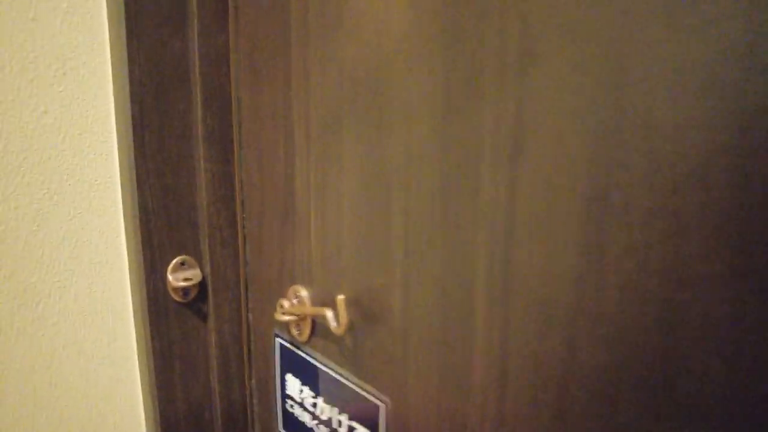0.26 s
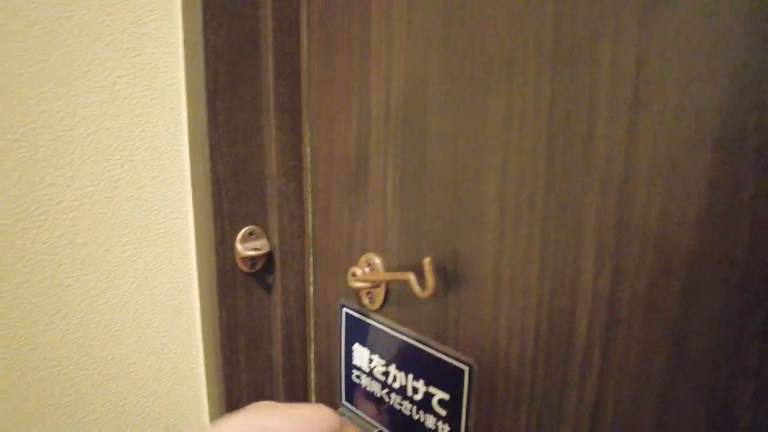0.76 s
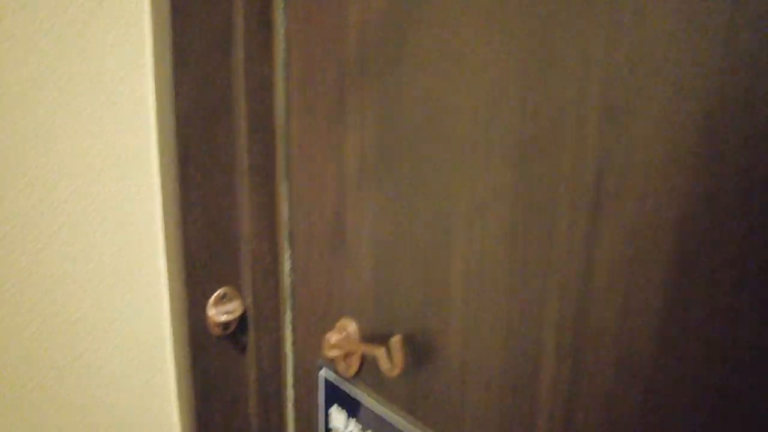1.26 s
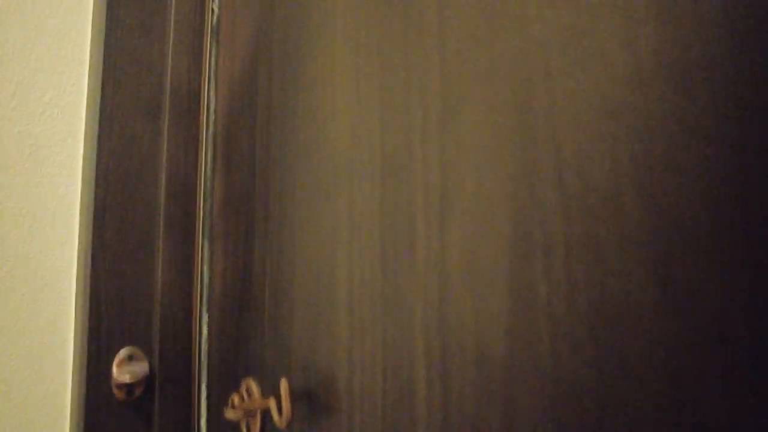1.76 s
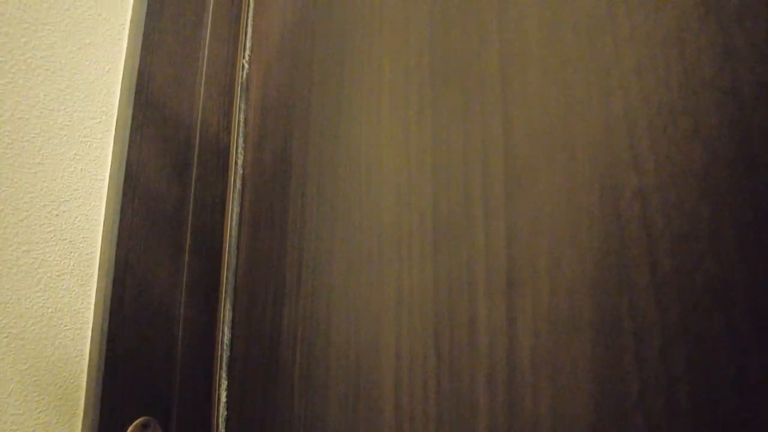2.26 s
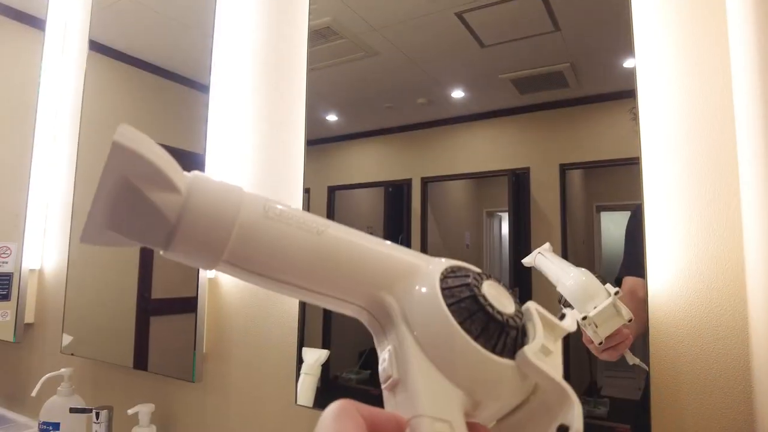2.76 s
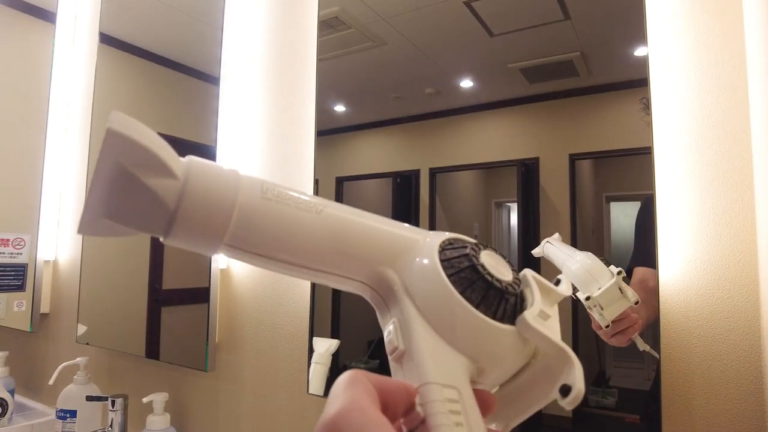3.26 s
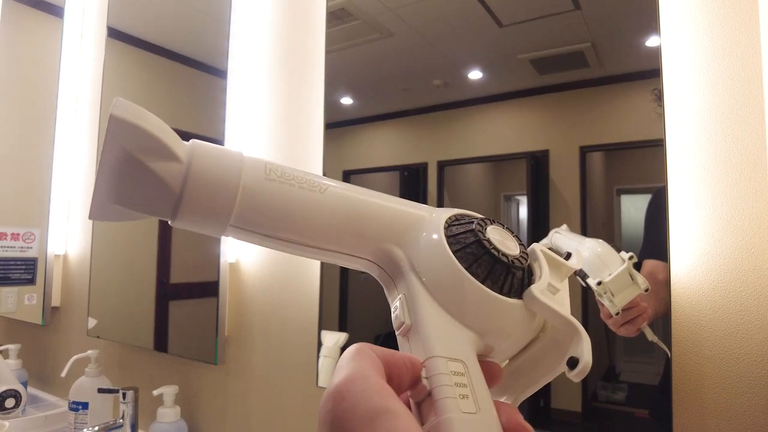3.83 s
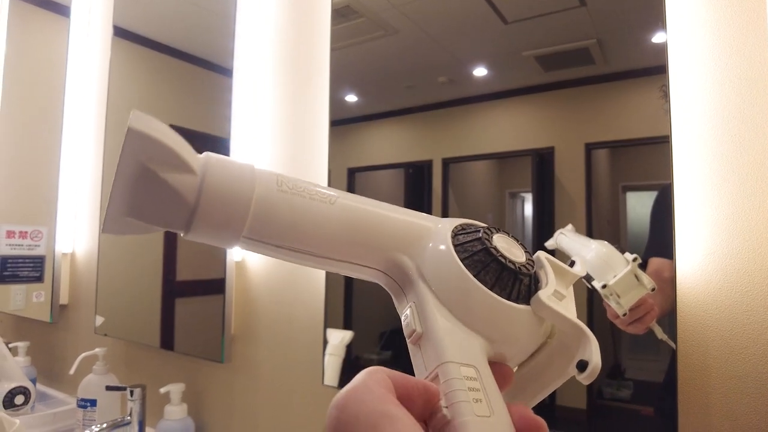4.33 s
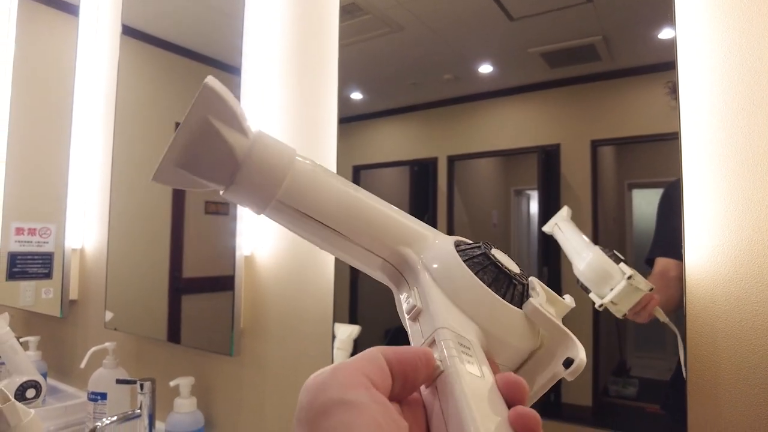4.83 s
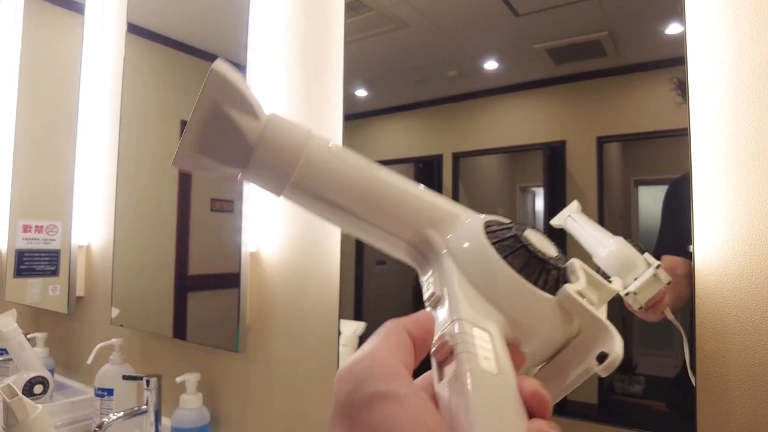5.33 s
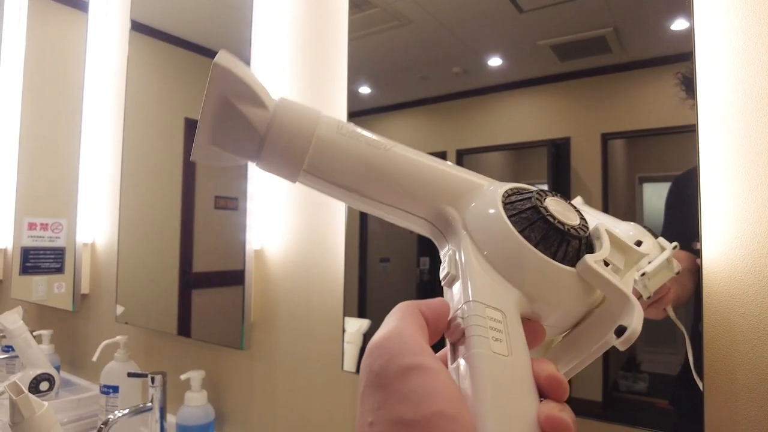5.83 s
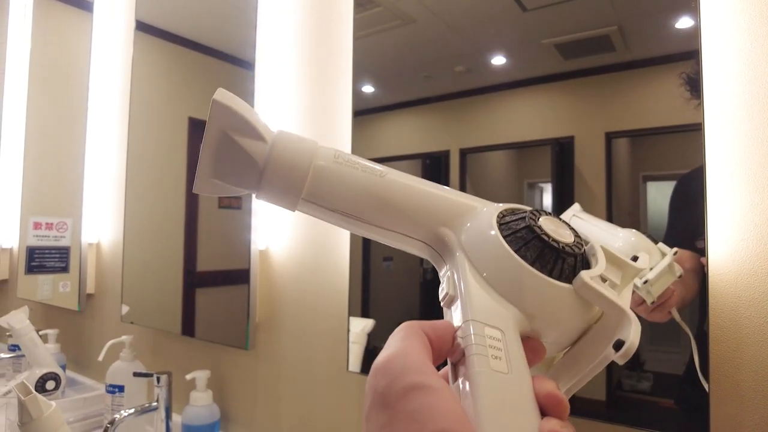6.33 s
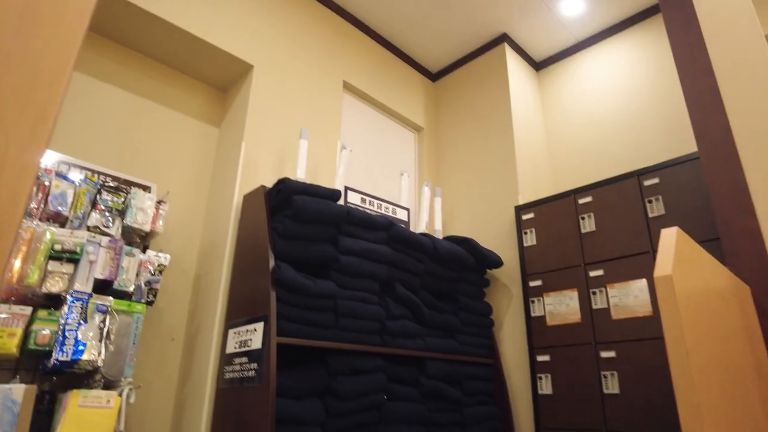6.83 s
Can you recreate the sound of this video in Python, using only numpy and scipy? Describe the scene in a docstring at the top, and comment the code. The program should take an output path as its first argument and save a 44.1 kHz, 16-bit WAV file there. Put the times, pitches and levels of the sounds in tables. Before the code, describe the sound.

Metal latch clicks and dull door knocks in an echoing hall, then a roaring hair dryer clicked off and on again, ending in faint room rumble.

```python
"""Three shots joined by hard cuts, heard in stereo at a hand-held camera; ventilation rumble lies under all.
First a hall: a wooden door is unlatched and pushed, with metal clicks, taps, scrapes and dull knocks.
Then a washroom: a hair dryer blows, its slide switch is clicked off, the fan coasts down, and it is
clicked on again in two steps. Last a quiet locker room. Air, rooms and rubbing are shaped noise;
metal and wood are decaying modes; echoes are noise tails that die at each frequency's own speed."""
import sys
import numpy as np
from scipy import signal
from scipy.fft import rfft, irfft, next_fast_len
from scipy.io import wavfile
from scipy.ndimage import uniform_filter1d, map_coordinates

SR = 44100
rng = np.random.default_rng(int(sys.argv[2]) if len(sys.argv) > 2 else 0)


def store_pcm(level_fs):
    """Save levels as 16-bit WAV."""
    pcm = np.round(np.clip(level_fs, -1, 1) * 32767).astype(np.int16)
    wavfile.write(sys.argv[1], SR, np.atleast_2d(pcm).T)


def level_to_linear(level):
    """Convert decibel levels to linear amplitude factors, elementwise."""
    exponent = np.asarray(level, float) / 20
    return 10 ** exponent


N = 312669
TIME = np.arange(N) / SR


def unit(x):
    """Scaled to rms 1."""
    return x / np.sqrt(np.mean(x ** 2) + 1e-20)


def along(points, hz):
    """Reads (Hz, value) points on a log frequency axis."""
    f, v = np.transpose(points)
    return np.interp(np.log(hz + 1), np.log(f + 1), v)


def curve(rows, column=1):
    """Joins timed rows into one value per sample."""
    rows = np.asarray(rows)
    return np.interp(TIME, rows[:, 0], rows[:, column])


def wobble(rate):
    """A smooth random curve, rate knots a second."""
    knots = rng.standard_normal(int(N * rate / SR) + 4)
    return map_coordinates(knots, [TIME * rate])


def filtered(x, response):
    """x times a response of frequency."""
    m = next_fast_len(x.shape[-1] + 8192)
    hz = np.fft.rfftfreq(m, 1 / SR)
    return irfft(rfft(x, m) * response(hz), m)[..., :x.shape[-1]]


def rush(level_db, alike, patchy_db):
    """Stereo noise of mid rms 1 with patches of random gain; level_db is a function of Hz."""
    z = signal.stft(rng.standard_normal((2, N)), nperseg=512)[2]
    field = rng.standard_normal(z.shape[1:])
    field = uniform_filter1d(uniform_filter1d(field, size=5, axis=0), size=12, axis=1)
    pair = signal.istft(z * level_to_linear(patchy_db * unit(field)), nperseg=512)[1][:, :N]

    def mid_side_gain(hz):
        slope = np.tan(np.arccos(np.clip(along(alike, hz), 0, 1)) / 2)
        return level_to_linear(level_db(hz)) * [np.ones_like(hz), slope]

    mid, side = filtered(pair, mid_side_gain)
    return np.array([mid + side, mid - side]) / np.std(mid)


def ringing(modes, t, spread_db):
    """One row per decaying mode, each at a new random strength."""
    hz, t60 = np.transpose(modes)[:, :, None]
    strength_db = spread_db * rng.standard_normal(hz.shape)
    return level_to_linear(strength_db - 60 * t / t60) * np.sin(2 * np.pi * hz * t)


def echoes(x, decay, colour):
    """A new diffuse room tail for each ear, each frequency dying at its own speed."""
    hz, t, z = signal.stft(rng.standard_normal((2, SR // 2)), SR, nperseg=128)
    fall = level_to_linear(along(colour, hz)[:, None] - 60 * t / along(decay, hz)[:, None])
    tail = signal.istft(z * fall, SR, nperseg=128)[1]
    tail *= np.minimum(np.arange(tail.shape[1]) / (0.00057 * SR), 1)  # rises over 0.57 ms
    return signal.fftconvolve(x[None], tail / np.linalg.norm(tail[0]), axes=1)


def blended(x, colour):
    """A pulse with the energy of x and its smooth colour: the room hears all directions of a contact."""
    pulse = filtered(signal.unit_impulse(len(x), 64), colour)
    return pulse * np.linalg.norm(x) / np.linalg.norm(pulse)


def add(out, s, sound):
    """Mixes a sound in from time s."""
    part = out[:, round(s * SR):][:, :sound.shape[1]]
    part += sound[:, :part.shape[1]]


def ears(pan_db):
    """Left and right gain; positive leans left."""
    return level_to_linear(np.array([[pan_db / 2], [-pan_db / 2]]))


# the dryer shot: start_s, end_s
SHOT_CUTS = [2.485, 6.5887]
# steady tone of each place: pitch_hz, level_db (per Hz)
HALL_TONE = [(41, -29.5), (70, -9), (77, -22), (105, -1.5), (172, -7), (258, -9.5), (330, -19), (472, -17),
             (505, -24), (791, -48), (1620, -41.5), (12800, -69), (15000, -65.5)]
WASHROOM_TONE = [(40, -31), (70, 1), (95, -1.5), (118, 6), (150, -4), (220, -9.5), (280, -4.5), (550, -7.5),
                 (800, -10.5), (900, -22), (1200, -20), (1600, -16), (1750, -22), (3000, -40), (6000, -57)]
LOCKER_ROOM_TONE = [(41, -39), (70, -23), (112, -1), (147, -22.5), (168, -10), (225, -11), (395, -24),
                    (472, -16), (605, -35), (926, -28.5), (991, -33.5), (1420, -33.5), (15000, -62)]
# hall, washroom and locker room in turn: level_db
ROOMS_DB = [-40, -44, -46.5]
# sound of the rooms at the two ears: pitch_hz, likeness (1 = left and right alike)
ROOM_LIKENESS = [(30, 0.9), (130, 0.99), (290, 0.81), (640, .2), (1400, 0.61), (6800, .1)]
# drifting low sound: start_s, throb_level_db, rumble_level_db
RUMBLE = [(0.0, -50, -35), (0.2, -33, -33), (0.33, -34, -30.5), (0.4, -33, -39.5), (0.7, -34, -52),
          (1.1, -40.5, -32.5), (1.3, -25, -42), (1.43, -27.5, -39.5), (1.54, -39, -45.5), (1.68, -31, -46),
          (2.0, -40, -43.5), (2.2, -37, -36), (2.6, -41.5, -45), (4.6, -45.5, -45), (4.82, -37.5, -42),
          (5.1, -40.5, -49.5), (6.5, -46.5, -46), (7.09, -57, -54)]
# colour of the rumble: pitch_hz, level_db (per Hz)
RUMBLE_COLOUR = [(21, -31.5), (35, -2), (55, -13.5), (76, -11.5), (90, -22.5), (120, -38), (200, -120)]
# sleeve and door seal brushing: start_s, level_db
RUSTLE = [(0.0, -58), (0.14, -51.5), (0.35, -51), (0.82, -52), (0.96, -58), (1.28, -47.5), (1.47, -57),
          (2.2, -56), (2.38, -51.5), (2.47, -55.5)]
# colour of the brushing: pitch_hz, level_db (per Hz)
CLOTH = [(350, -12), (600, 3), (939, -8.5), (1470, -6.5), (1680, -10), (3510, -23), (14000, -50.5)]


def rooms():
    """Each shot has its own noise-like room tone; deep rumble drifts over all, rustling over the hall."""
    shot = np.searchsorted(SHOT_CUTS, TIME)
    tones = []
    for shape, db in zip((HALL_TONE, WASHROOM_TONE, LOCKER_ROOM_TONE), ROOMS_DB):
        air = rush(lambda hz: along(shape, hz), ROOM_LIKENESS, patchy_db=1.5)
        tones.append(level_to_linear(db + 1.6 * wobble(4.7)) * air)
    # a broad deep resonance at 27.24 Hz
    throb = filtered(rng.standard_normal(N), lambda hz: 1 / (1 + ((hz - 27.24) / 8) ** 2))
    throb = level_to_linear(curve(RUMBLE) + 0.74 * wobble(2.78)) * unit(throb) * ears(-2.6)
    rumble = rush(lambda hz: along(RUMBLE_COLOUR, hz), ROOM_LIKENESS, patchy_db=2.5)
    rumble *= level_to_linear(curve(RUMBLE, column=2) + 1.2 * wobble(3.9))
    rustle = rush(lambda hz: along(CLOTH, hz), ROOM_LIKENESS, patchy_db=1.0)
    rustle *= level_to_linear(curve(RUSTLE) + 0.8 * wobble(26.15))
    return np.choose(shot, tones) + throb + rumble + rustle * (shot == 0)


# ringing of latch, handle and hook: pitch_hz, t60_s
BRASS = [(2900, .04), (4800, .09), (5900, .035), (8100, .09), (11400, .22), (13700, .12)]
# strength of the three brass modes that the hook rings: level_db
HOOK_DB = [-3, 0, -17]
# the loose hook chatters: start_s, end_s, level_db
RATTLE = [(0.207, 0.3, -59.5), (0.3, 0.385, -54.5), (1.108, 1.164, -60), (2.186, 2.31, -72)]
# hinge: start_s, end_s, start_pitch_hz, end_pitch_hz, level_db, flicker_db
SQUEAKS = [(1.05, 1.105, 13900, 14500, -69, 1.5), (1.295, 1.335, 14700, 14100, -69, 1.5),
           (1.73, 2.0, 3420, 3540, -69.5, 5.5), (1.72, 1.98, 1480, 1400, -64, 6)]


def handle():
    """Uneven scratchy taps ring three brass modes as the hook turns; the hinge squeaks, thin and breathy."""
    taps, squeak, t = np.zeros(N), np.zeros(N), np.arange(SR // 8) / SR
    for a, b, db in RATTLE:
        times = np.arange(a, b, .006)
        uneven = times + .003 * rng.standard_normal(len(times))
        taps[(uneven * SR).astype(int)] = level_to_linear(db + 3 * rng.standard_normal(len(times)))
    grit = level_to_linear(-60 * t / .012) * rng.standard_normal(len(t))
    grit = filtered(grit, lambda hz: 1 / (1 + ((hz - 6000) / 2000) ** 2))
    hook = level_to_linear(HOOK_DB) @ ringing(BRASS, t, spread_db=1)[1:4] + grit
    for a, b, start_hz, end_hz, db, flicker_db in SQUEAKS:
        u = np.clip((TIME - a) / (b - a), 0, 1)
        pitch = (start_hz + (end_hz - start_hz) * u) * (1 + 0.015 * wobble(300))
        swell = level_to_linear(db + flicker_db * wobble(45.1)) * np.sin(np.pi * u)
        squeak += swell * np.sin(2 * np.pi * np.cumsum(pitch) / SR)
    return signal.fftconvolve(taps, hook)[:N] + squeak


# decay of the hall: pitch_hz, t60_s
HALL_DECAY = [(200, .5), (1000, .55), (4000, .48), (8000, .42), (15000, .36)]
# colour of the hall's echo: pitch_hz, level_db
HALL_COLOUR = [(200, 8), (600, 8), (1500, 4), (4000, -3), (9000, -7), (15000, -13.5)]
# modes of the thin door panel: pitch_hz, t60_s, level_db
PANEL = [(540, 0.05, -0.5), (760, 0.036, -3.5), (983, .045, -2.5), (1296, 0.049, -4), (1625, .035, -6),
         (1960, .03, -7.5), (2300, 0.025, -8.5), (2700, .02, -9.5)]
# light taps on the panel: start_s, level_db
TAPS = [(0.109, -47), (.257, -47), (.300, -28.5), (.32, -33.5), (.338, -36.5), (.477, -43), (0.525, -47.5),
        (0.536, -41.5), (0.626, -40.5), (.676, -42.5), (2.159, -48), (2.335, -50), (2.391, -44)]
# bolt and hand drag over wood; the row at 0.774 s is a short noise swelling just before the slam:
# start_s, end_s, centre_pitch_hz, level_db
SCRAPES = [(0.1, .2, 2200, -65), (0.297, .41, 1880, -50), (0.528, 0.596, 2500, -61),
           (0.657, 0.728, 1890, -43), (0.774, 0.797, 4620, -44), (1.718, 1.981, 5500, -71),
           (1.86, 1.96, 3000, -63), (1.339, 1.378, 2600, -53), (2.332, 2.361, 2200, -55),
           (2.395, 2.437, 2200, -52)]


def panel():
    """Light taps ring the thin door panel; scrapes and a swell before the slam are uneven grains of noise."""
    out, t = np.zeros((2, N)), np.arange(SR // 4) / SR
    grains_per_s = 5900
    for s, db in TAPS:
        modes = ringing([m[:2] for m in PANEL], t, spread_db=5.5)
        ring = level_to_linear(db + np.transpose(PANEL)[2]) @ modes * (1 - np.exp(-t / .001))
        add(out, s, ring * ears(.6))
        add(out, s, level_to_linear(-2.5) * echoes(ring, HALL_DECAY, HALL_COLOUR))
    for a, b, centre_hz, db in SCRAPES:
        u = np.arange(round((b - a) * SR)) / ((b - a) * SR)
        grains = (rng.random(len(u)) < grains_per_s / SR) * level_to_linear(3 * rng.standard_normal(len(u)))
        grains = grains * (.7 + rng.standard_normal((2, len(u))))  # partly alike at the two ears
        rub = filtered(grains, lambda hz: (1 + (np.log2((hz + 1) / centre_hz) / 0.94) ** 2) ** -2)
        rub = unit(rub) * level_to_linear(db) * np.sqrt(np.sin(np.pi * u))
        add(out, a, rub)
        add(out, a, level_to_linear(-28.0) * echoes(rub[0], HALL_DECAY, HALL_COLOUR))
    return out


# blows on door leaf and grip: start_s, level_db, lowest_mode_level_db
KNOCKS = [(0.137, -23, -0.5), (0.230, -11.5, -4), (0.262, -18.5, 0), (0.29, -18, 2), (0.32, -12.5, -8),
          (0.423, -16.5, -5.5), (0.479, -14.5, -3.5), (0.794, -19, -4.5), (0.829, -24, -4),
          (1.098, -18.5, 0.5), (1.137, -20, -5), (1.239, -9, -6), (1.279, -14.5, 0), (2.213, -16, -10),
          (2.24, -24.5, 1.5), (2.388, -15.5, -8), (2.41, -24, -7.5)]
# low modes of the door leaf: pitch_hz, t60_s
LEAF = [(119, 0.12), (175, 0.064), (225, 0.071), (280, 0.084), (480, 0.082)]
# strength of the upper four leaf modes: level_db
LEAF_DB = np.array([1.5, -3.0, -8.5, -19.5])


def knocks():
    """Soft blows ring the low modes of the door leaf, alike at both ears."""
    out, t = np.zeros((2, N)), np.arange(SR // 3) / SR
    soft_onset = (1 - np.exp(-t / 0.0041)) ** 2
    for s, db, low_db in KNOCKS:
        modes = ringing(LEAF, t, spread_db=2.5)
        leaf = level_to_linear(low_db) * modes[:1] + level_to_linear(LEAF_DB) @ modes[1:]
        add(out, s, level_to_linear(db) * leaf * soft_onset)
    return out


# latch and handle contacts; the slam starts at 0.795 s, the row at 0.788 s is a short noise just before it:
# start_s, level_db, centre_pitch_hz, room_level_db, ring_level_db
LATCH = [(.107, -50, 1900, 4, -26), (.111, -60, 11000, -3, -26), (.143, -43, 2920, -6, -16),
         (.147, -48.5, 13800, -3, -20), (0.217, -46, 5700, 4, -1), (.205, -57, 6000, -4, -14),
         (0.232, -47, 6500, -2, -10), (0.232, -50, 13700, 2, -17), (0.295, -25.5, 2980, 3.5, -32),
         (.299, -24, 1190, 3, -26.5), (.348, -34, 5700, 0, -15), (.528, -61.5, 7000, -3.5, -35),
         (.540, -48, 3500, 4, -31), (.541, -52, 12800, -4.5, -24), (0.625, -35.5, 3500, 3.5, -22.5),
         (0.666, -43.5, 5000, 4, -23.5), (0.676, -34, 2550, 5, -23.5), (0.788, -22, 2490, 1.5, -24),
         (0.7952, -7, 3320, 7, -32.5), (.797, -12, 11000, -0.5, -32), (.801, -26, 776, -6, -33),
         (1.110, -40.5, 6100, 4, -22.5), (1.126, -40, 1500, 5, -25), (1.154, -48.5, 5900, -3, -26),
         (1.242, -41, 1810, 4.5, -22), (1.217, -57, 8000, -4.5, -28), (1.404, -54.5, 9000, -4.5, -30),
         (1.333, -34.5, 2880, -4.5, -14), (1.334, -44.5, 11400, 4.5, -29), (2.159, -37.5, 4700, 2.5, -24.5),
         (2.160, -37, 2600, 4, -22), (2.180, -37.5, 5550, 4, -18), (2.18, -42, 8100, 7, -10),
         (2.183, -49.5, 11300, 1, -1), (2.324, -35.5, 5500, 1.5, -21), (2.325, -41, 10000, -2, -24),
         (2.334, -43, 2200, 0, -20), (2.391, -39.5, 2590, -6, -18), (2.397, -46, 3200, -13, -21)]


def latch():
    """Each row is a crack of noise around its centre, echoed long by the hall; near brass modes ring on."""
    out, t = np.zeros((2, N)), np.arange(SR // 4) / SR
    envelope = level_to_linear(-60 * t / 0.018) * (1 - np.exp(-t / 0.0012))
    for s, db, centre_hz, room_db, ring_db in LATCH:
        # crack width in octaves: wider with force, narrower when the brass rings freely
        breadth = max(1.97 + 0.01 * (db + 35.5) - 0.36 * (ring_db + 24.0), .3)
        colour = lambda hz: (1 + (np.log2((hz + 1) / centre_hz) / breadth) ** 2) ** -2.5
        noise = envelope * rng.standard_normal((2, len(t)))
        # the direct crack loses its top above 14970 Hz
        crack, other = filtered(noise, lambda hz: colour(hz) / (1 + (hz / 14970) ** 4))
        scale = level_to_linear(db) / np.abs(crack).max()
        crack *= scale
        # above 3550 Hz the two ears hear a crack differently
        other = scale * filtered(other, lambda hz: .55 / np.sqrt(1 + (3550 / (hz + 1)) ** 2))
        reach_db = -55 * np.abs(np.log2(np.transpose(BRASS)[0] / centre_hz))
        ring = level_to_linear(db + ring_db + reach_db) @ ringing(BRASS, t, spread_db=0.5)
        add(out, s, (crack + ring + other * [[1], [-1]]) * ears(-0.48))
        add(out, s, level_to_linear(room_db) * echoes(blended(crack, colour) + ring, HALL_DECAY, HALL_COLOUR))
    return out


# slide switch contacts: start_s, level_db, low_level_db, middle_mode_level_db, scrape_level_db
SWITCH = [(4.2892, -8.5, -1.5, -11.5, -15.5), (4.319, -17.5, 3.5, -9, -12.5), (4.588, -25, 1, -8.5, -8),
          (4.941, -31.5, 5.5, -2.5, -14), (4.9686, -37, 5, -6, -4.5), (5.008, -25.5, 4, 0, -10.5),
          (5.033, -52, 3.5, -3, -5), (5.1, -5.5, 1, 0.5, -20.5), (5.2413, -22.5, 4.5, -2, -9.5),
          (5.2464, -26.5, 6, -5, -9), (5.255, -26.5, 7, 4, -6.5)]
# resonances of the slider shell: pitch_hz, width_hz, level_db
PLASTIC = [(1875, 750, -2.5), (3860, 2300, -4.5), (6500, 770, 5.5), (8400, 1000, 3.5), (13700, 6500, -10)]
# decay of the tiled washroom: pitch_hz, t60_s
TILES = [(1000, .22), (4000, .24), (8000, .22), (15000, .18)]
# colour of the washroom's echo: pitch_hz, level_db
TILE_COLOUR = [(1000, 11.5), (4000, 2.5), (8000, -5), (15000, 3)]


def switch():
    """A plastic slider snaps: sharp blows and a short scrape coloured by the shell, then the tiled room."""
    out, t = np.zeros((2, N)), np.arange(SR // 20) / SR
    left_lag_s = .00003  # the left ear hears the switch later
    for s, db, low_db, middle_db, scrape_db in SWITCH:
        burst = level_to_linear(scrape_db) * np.exp(-t / .003) * rng.standard_normal(len(t))  # the slider scrapes home
        burst[[0, 30]] += .6, 1  # the detent gives, then snaps home

        def shell(f):
            total = 0
            for k, (c, w, g) in enumerate(PLASTIC):
                gain = (-1) ** k * level_to_linear(g + low_db * (k < 2) + middle_db * (k == 2))
                total = total + gain * 1j * f * w / (c * c - f * f + 1j * f * w)
            return total

        snap = filtered(burst, shell)
        snap *= level_to_linear(db) / np.abs(snap).max()
        lag = lambda f: np.exp(1j * np.pi * f * left_lag_s * [[-1], [1]])
        add(out, s, filtered(snap * ears(-0.5), lag))
        add(out, s, level_to_linear(-6.5) * echoes(blended(snap, shell), TILES, TILE_COLOUR))
    return out


# the slider is pushed on in two steps: start_s, speed aimed at (share of full), rise_s
STEPS = [(5.1, .48, 0.01483), (5.24, 1, 0.11)]


def fan_speed():
    """Full speed, a coast against air drag once off, then a slow-starting rise to each new setting."""
    off_s, coast_s = 4.308, .33  # air drag halves the speed in coast_s
    # a power over 1: the fan holds its speed a moment before it sags
    speed = 1 / (1 + (np.maximum(TIME - off_s, 0) / coast_s) ** 1.06)
    for s, aim, rise_s in STEPS:
        u = np.maximum(TIME - s, 0) / rise_s
        rise = aim - (aim - speed[round(s * SR)]) * (1 + u) * np.exp(-u)
        speed = np.where(TIME > s, rise, speed)
    return speed


# air through the barrel: pitch_hz, level_db (per Hz)
ROAR = [(88, -46), (150, -12), (294, -1.5), (584, -2), (945, -4), (1040, -1), (1570, -5), (1800, -7),
        (4000, -17.5), (5200, -37.5), (8800, -120)]
# jet and grille: pitch_hz, level_db (per Hz)
HISS = [(1470, -26.5), (2500, -8), (2680, -7), (3620, -11.5), (4230, -2.5), (7740, -4), (9840, -10),
        (15100, -16), (15900, -16)]
# peaks and dips the room gives the dryer noise: pitch_hz, width_hz, level_db
ROOM_PEAKS = [(300, 33, 4.5), (605, 45, 7.5), (731.6, 11.4, 9.5), (826, 23, 9.5), (952.5, 81, 11),
              (1021, 38, -12), (1308, 90, 4), (1586, 106, 6.5), (2134, 250, 7.5), (2672, 97, 7.5),
              (3253, 330, 6), (4200, 800, 4.5), (7000, 620, -3.5), (8100, 600, 0.5)]
# fan tone: multiple of the blade pitch, level_db at full speed
BLADES = [(1, -42.5), (2, -41), (4, -71.5)]
# the hand turns the nozzle: start_s, level_db
AIM = [(2.5, 0.1), (3.5, 0.3), (5.6, 0.53), (6.2, -0.6), (6.6, 0.3)]
# dryer noise at the two ears: pitch_hz, likeness (1 = left and right alike)
DRYER_LIKENESS = [(60, 0.98), (290, 0.94), (500, 1), (750, 0.38), (1400, 1), (3100, 0.52), (6800, 0.59),
                  (9300, 0.47), (15000, 0.456)]
# dryer, left minus right: pitch_hz, level_db
TILT = [(60, -7.5), (180, 0.5), (550, 1), (1650, 1.0), (4970, -1), (15000, 1.0)]
# dryer, how far the left ear leads: pitch_hz, lead_rad
LEAD = [(0, 8.5), (600, -0.94), (860, 2), (1290, 0.78), (2500, -1.06), (4390, 1.4), (6030, -1), (8790, 1.5),
        (9130, 0.5), (9650, -3.5), (10200, 1.5), (12500, 1), (15800, 0.5), (16500, 5)]


def dryer():
    """Roar and hiss grow as powers of fan speed, hiss faster; blades sing; a switch click's ring fades."""
    speed = fan_speed()
    speed_db = 20 * np.log10(speed)
    aim_db = curve(AIM)
    peaks = lambda hz: sum(db / (1 + (2 * (hz - c) / w) ** 2) for c, w, db in ROOM_PEAKS)

    flutter = aim_db + 0.084 * wobble(3.7) + 0.26 * wobble(14)
    roar = rush(lambda hz: along(ROAR, hz) + peaks(hz), DRYER_LIKENESS, patchy_db=1.0)
    roar *= level_to_linear(-30.0 + 2.73 * speed_db + flutter)
    hiss = rush(lambda hz: along(HISS, hz) + peaks(hz), DRYER_LIKENESS, patchy_db=0.4)
    hiss *= level_to_linear(-37.5 + 3.13 * speed_db + aim_db)

    # a narrow 6.5 kHz ring left by the switch click fades in the room
    click_s, second_step_s = STEPS[0][0], STEPS[1][0]
    narrow = lambda hz: -10 * np.log10(1 + ((hz - 6550) / 130) ** 2)
    click_ring = rush(narrow, DRYER_LIKENESS, patchy_db=5.5)
    click_ring *= level_to_linear(-47.5 - 60 * np.abs(TIME - click_s))  # fades 60 dB a second
    click_ring *= (TIME > click_s) & (TIME < second_step_s)

    blade_hz = 681  # at full speed
    turn = 2 * np.pi * np.cumsum(blade_hz * speed * (1 + 0.00306 * wobble(9.5))) / SR
    tone = sum(level_to_linear(db + 4.8 * speed_db + 2.2 * wobble(12)) * np.sin(k * turn) for k, db in BLADES)

    def left_right(hz):
        sides = np.array([[1], [-1]])
        return level_to_linear(along(TILT, hz) / 2 * sides) * np.exp(.5j * along(LEAD, hz) * sides)

    return filtered(roar + hiss + click_ring + tone, left_right)


def scene():
    """Hard cuts join the shots: door in the hall, dryer in the washroom, quiet locker room."""
    shot = np.searchsorted(SHOT_CUTS, TIME)
    door = latch() + handle() + knocks() + panel()
    washroom = dryer() + switch()
    return rooms() + door * (shot == 0) + washroom * (shot == 1)


def band_limit(x):
    """A steep low-pass at the top of the band."""
    return signal.sosfilt(signal.butter(12, 16990, fs=SR, output="sos"), x)


def record(dry):
    """The camera keeps nothing above its band limit of 15950 Hz."""
    mix = filtered(dry, lambda hz: hz < 15950)
    return band_limit(mix)


dry = scene()
out = record(dry)
store_pcm(out)
```